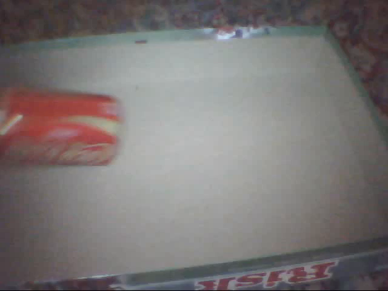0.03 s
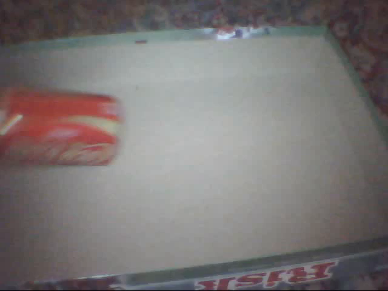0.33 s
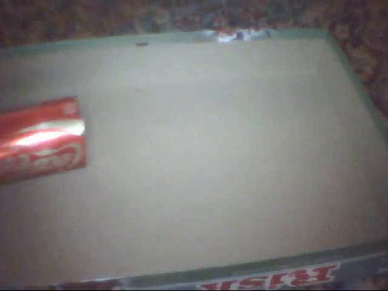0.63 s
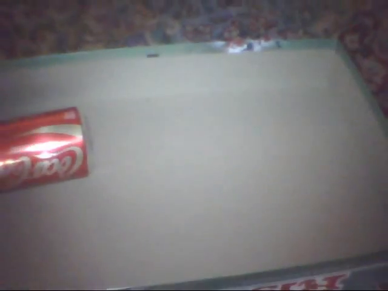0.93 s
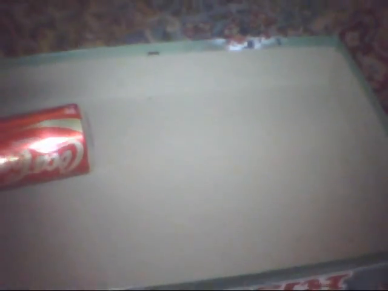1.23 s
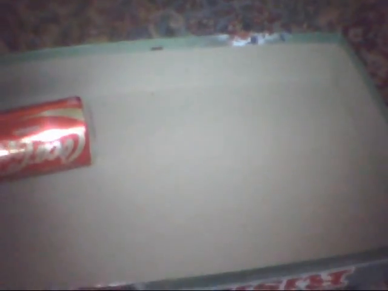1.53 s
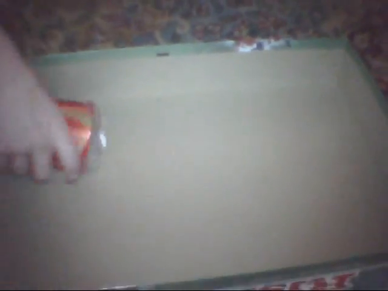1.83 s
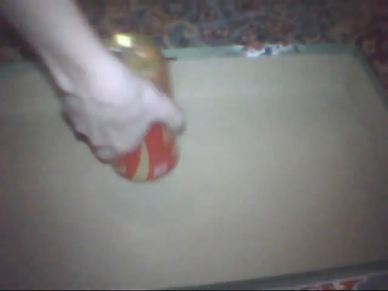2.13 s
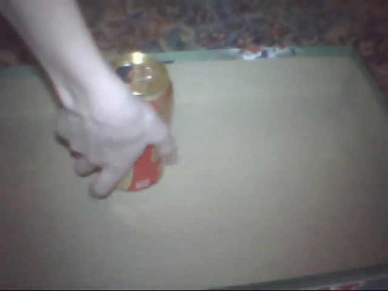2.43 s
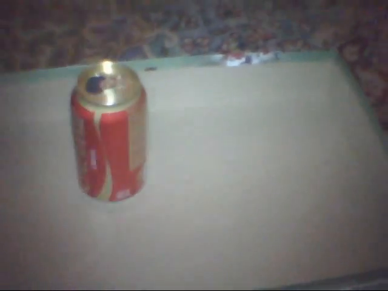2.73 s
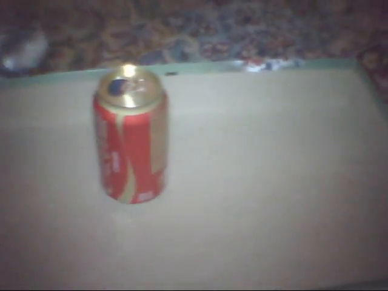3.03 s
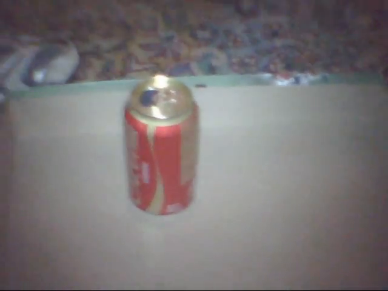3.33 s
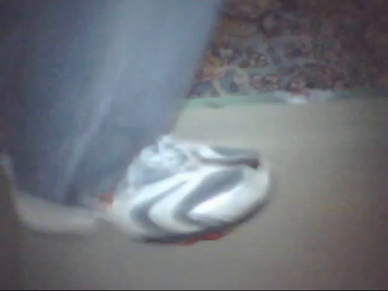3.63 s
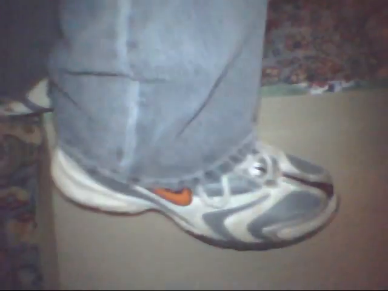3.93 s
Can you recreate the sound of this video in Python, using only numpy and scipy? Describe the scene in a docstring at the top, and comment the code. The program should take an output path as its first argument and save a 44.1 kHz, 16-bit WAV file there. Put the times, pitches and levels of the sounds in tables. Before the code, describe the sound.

A drink can is stamped flat with a dense metallic crunch and a floor thump, after first knocking twice on cardboard and being quietly handled. The small carpeted room is picked up by a cheap microphone with hum and hiss.

```python
"""Dropping and stamping on a can

An empty drink can drops into a shallow cardboard box and rattles to rest; a hand stands it upright.
A shoe stamps it flat: the wall buckles in a dense crunch, the sole lands and the floor bounces.
A cheap, dull microphone in a small carpeted room overloads on the blows and hums with the mains."""
import sys
import numpy as np
from scipy import signal
from scipy.fft import rfft, irfft
from scipy.io import wavfile
from scipy.ndimage import uniform_filter1d

SR = 44100
rng = np.random.default_rng(int(sys.argv[2]) if len(sys.argv) > 2 else 0)


def wav_record(signal):
    """Record a signal, one row per channel, as 16-bit PCM in the file named by sys.argv[1]."""
    frames = np.transpose(np.atleast_2d(signal))
    bounded = np.clip(frames, -1, 1)
    # unit amplitude maps onto the largest positive 16-bit level
    quanta = np.round(bounded * 32767).astype(np.int16)
    wavfile.write(sys.argv[1], SR, quanta)


N = 176400

# tone of struck cardboard: (frequency [Hz], relative level [dB])
CARDBOARD_TONE = [(60, 7), (200, -3.5), (450, 5.5), (900, -3.5), (1600, -10.5), (2500, -17), (3500, -40.5),
                  (7000, -42)]
# tone of a sharp crack of metal: (frequency [Hz], relative level [dB])
CRACK_TONE = [(200, -14), (800, 9.5), (1600, 11.5), (2800, -2.5), (3400, 5.5), (4400, 3.5), (6000, 1.5),
              (7200, 3.5)]
CARDBOARD_FADE_S, CRACK_FADE_S = .04, .028  # a fade time is how long a sound takes to fall by 60 dB
TOP_HZ = 7700


def undb(db):
    """Turn decibels into a number to multiply by."""
    return 10 ** (np.asarray(db) / 20)


def level(x, db):
    """Set the average (rms) level of a sound."""
    return x * undb(db) / np.sqrt(np.mean(x ** 2))


def blow(x):
    """Scale a hit so that its first 10 ms have an average (rms) strength of 1."""
    return x / np.sqrt(np.mean(x[:SR // 100] ** 2))


def clock():
    """The time of every sample, in seconds."""
    return np.arange(N) / SR


def fade(fade_s):
    """A curve that dies away by 60 dB in the given time."""
    return np.exp(-np.log(1000) * np.minimum(clock() / fade_s, 10))


def along(hz, points):
    """Read between (frequency, value) points, with all octaves equally wide."""
    frequencies, values = np.array(points, float).T
    return np.interp(np.log(np.maximum(hz, 1)), np.log(frequencies), values)


def through(x, response):
    """Let every sample of a sound set off its own copy of a response."""
    return signal.fftconvolve(x, response[:SR])[:N]


def colour(x, points):
    """Filter a sound to give it the listed tone."""
    size = 8192
    gains = undb(along(np.arange(size // 2 + 1) * SR / size, points))
    cepstrum = irfft(np.log(gains))
    cepstrum[1:size // 2] *= 2  # fold one half onto the other, so nothing rings ahead of a hit
    cepstrum[size // 2 + 1:] = 0
    return through(x, irfft(np.exp(rfft(cepstrum))))


def cut_treble(x, hz=TOP_HZ):
    """Steeply remove what lies above a frequency."""
    return signal.sosfilt(signal.cheby1(10, .1, hz, fs=SR, output="sos"), x)


def burst(tone, fade_s):
    """Many close vibrations blur into a short, fading noise."""
    size = SR // 3
    noise = rng.standard_normal(size) * fade(fade_s)[:size]
    return blow(cut_treble(colour(noise, tone)))


def ring(notes):
    """A struck object rings with several pure notes, each fading at its own speed."""
    t = clock()[:SR]
    return blow(sum((-1) ** k * undb(db) * np.sin(2 * np.pi * hz * t) * fade(fade_s)[:SR]
                    for k, (hz, db, fade_s) in enumerate(notes)))


def add(out, start, sound):
    """Mix a sound in at a time in seconds."""
    i = int(start * SR)
    out[i:i + len(sound)] += sound[:N - i]


def electronics(mains_hz=60):
    """The microphone adds mains hum, a thin whine, hiss and a slight rumble."""
    # notes of the hum: (multiple of the mains frequency, level [dB])
    hum_notes = [(1, -21.5), (2, -62.5), (3, -52), (5, -46.5), (7, -62), (9, -65.5)]
    # notes of the electrical whine: (frequency [Hz], level [dB])
    whine_notes = [(1701, -70.5), (1921, -65.5), (3838, -72.5)]
    # tone of the hiss: (frequency [Hz], relative level [dB])
    hiss_tone = [(20, 16), (45, 9.5), (90, 13), (130, 3.5), (350, 1.5), (600, -5.5), (1000, -9.5),
                 (1700, -8.5), (2100, -11.5), (2900, -12), (3400, -14.5), (6600, -19.5)]
    # tone of the rumble: (frequency [Hz], relative level [dB])
    rumble_tone = [(8, -6.5), (22, 3), (45, -15.5), (200, -63.5)]
    t = clock()
    hum = sum(undb(db) * np.sin(2 * np.pi * k * mains_hz * t) for k, db in hum_notes)
    whine = sum(undb(db) * np.sin(2 * np.pi * hz * t) for hz, db in whine_notes)
    hiss = level(cut_treble(colour(rng.standard_normal(N), hiss_tone)), db=-46)
    rumble = level(colour(rng.standard_normal(N), rumble_tone), db=-37)
    return np.sqrt(2) * (hum + whine) + hiss + rumble


def can_ring():
    """The can's thin metal rings with clear notes and a shimmer of weak ones between them."""
    # notes of the can: (frequency [Hz], relative level [dB], fade time [s])
    can_notes = [(870, -10.5, 0.33), (1396, -3, 0.19), (1790, -6, .3), (2240, -10, 0.23), (2580, -10, .2),
                 (3105, -15, .2), (3330, 1, 0.17), (3420, -7, 0.11), (3530, -16.5, 0.11), (3960, -7, 0.16),
                 (4650, -7.5, .19), (4880, -10, .14), (5163, -5, 0.11), (5160, -4.5, 0.097),
                 (5750, -3, .14), (6200, -4, 0.11), (5900, -6, 0.092), (6450, -4, 0.1), (6450, -0.5, 0.09)]
    can = ring(can_notes)
    add(can, 0, undb(-7) * burst(CRACK_TONE, fade_s=.12))
    return can


def taps(can):
    """Rim and fingers tap lightly as the can rocks, is gripped and is set down."""
    # light touches: (time [s], tap [dB], metal crack [dB], can ring [dB])
    touches = [(.038, -29.5, -36.5, -52.5), (0.2802, -37.5, -53, -56.5), (.381, -38, -58.5, -60.5),
               (.584, -24.5, -29.5, -52), (.596, -34, -33, -43.5), (1.54, -44.5, -63.5, -63),
               (1.695, -37.5, -38.5, -55), (1.700, -32, -37.5, -48), (1.726, -40, -43.5, -48),
               (1.75, -48, -46, -71), (2.242, -32.5, -49, -63), (2.405, -43.5, -54, -76),
               (2.518, -35.5, -58.5, -69), (2.599, -44.5, -67, -83.5), (2.654, -46, -56.5, -69),
               (2.781, -45.5, -67, -79), (3.955, -42, -51.5, -62), (3.975, -36, -55, -67)]
    # tone of a tap: (frequency [Hz], relative level [dB])
    tap_tone = [(150, -19), (330, 5.5), (480, 5.5), (750, 1.5), (950, 1.5), (1150, -9.5), (1550, -0.5),
                (2050, -14), (2450, -6.5), (2700, -13), (3000, -23), (3400, -18), (4000, -29),
                (7000, -35.5)]
    out = np.zeros(N)
    for start, tap_db, crack_db, ring_db in touches:
        add(out, start, undb(tap_db) * burst(tap_tone, fade_s=.03))
        add(out, start, undb(crack_db) * burst(CRACK_TONE, CRACK_FADE_S))
        add(out, start, undb(ring_db) * can)
    return out


def knocks(can):
    """The can lands and bounces: the cardboard knocks and booms, the metal cracks and rings."""
    # hits on the box: (time [s], cardboard [dB], boom [dB], metal crack [dB], can ring [dB], contact [s])
    hits = [(0.0596, -19, -20, -15, -50, 0.0026), (0.0612, -12, -16.5, -16, -46.5, 0.0022),
            (0.0644, -10, -20.5, -13, -48.5, 0.00099), (0.078, -17.5, -19, -43, -47.5, 0.0036),
            (0.095, -19.5, -23.5, -41.5, -47.5, .002), (0.118, -24, -29, -33, -52.5, .002),
            (0.153, -31.5, -29, -54, -62, .004), (0.5219, -19, -33.5, -16, -24, 0.0013),
            (.535, -26, -36.5, -43, -43, 0.00084), (.654, -46, -49.5, -37, -50.5, 0.0028),
            (.711, -51.5, -62, -50.5, -58.5, 0.0026)]
    # notes of the cardboard: (frequency [Hz], relative level [dB], fade time [s])
    box_notes = [(403, 1, 0.066), (481, -3.5, 0.059), (512, -10.5, 0.14), (611, -5, 0.051), (870, -10, .05),
                 (1272, -12, 0.05), (1440, -25.5, 0.078), (1630, -11, 0.04), (1817, -16, 0.068),
                 (2320, -12, 0.027), (2530, -15, 0.021)]
    # the whole box heaving on the carpet: (frequency [Hz], relative level [dB], fade time [s])
    boom_notes = [(138, -0.5, 0.17), (205.3, 3, 0.1), (268, 1.5, 0.12)]
    # notes of the can's stiff end: (frequency [Hz], relative level [dB], fade time [s])
    end_notes = [(3280, -8, .17), (5700, -18.5, .18), (6860, -2.5, 0.24), (6930, 7.5, 0.23)]
    out, box, boom = np.zeros(N), ring(box_notes), ring(boom_notes)
    for start, box_db, boom_db, crack_db, ring_db, contact_s in hits:
        add(out, start, undb(box_db) * box + undb(boom_db) * boom + undb(ring_db) * can)
        add(out, start, undb(box_db + .5) * burst(CARDBOARD_TONE, CARDBOARD_FADE_S))
        add(out, start, undb(crack_db) * burst(CRACK_TONE, fade_s=10 * contact_s))
    add(out, .0645, undb(-36.5) * ring(end_notes))  # only the first landing rings the end
    return out


def hollow_air():
    """The air in the can rings on each hard landing, sinking in pitch as the can settles."""
    # hard landings: (time [s], level [dB])
    landings = [(.065, -25), (.524, -24)]
    final_hz, sink_hz, sink_s = 347.7, 71.4, .032
    hz = final_hz + sink_hz * np.exp(-clock() / sink_s)
    note = np.sin(2 * np.pi * np.cumsum(hz) / SR) * fade(.51)
    out = np.zeros(N)
    for start, db in landings:
        add(out, start, undb(db) * note)
    return out


def rubbing():
    """The can slides, then the sleeve and hand, with a soft, uneven hiss."""
    # strength of the sliding: (time [s], level [dB])
    sliding = [(.1, -49), (.19, -60), (.22, -50), (.27, -55), (0.399, -66.5), (1.349, -67), (1.43, -55),
               (1.58, -63.5), (1.655, -50.5), (1.68, -52), (1.73, -47), (1.78, -61), (1.9, -59.5),
               (2.05, -65.5), (2.17, -58.5), (2.35, -67.5), (2.72, -61), (3.45, -59.5)]
    # tone of the rubbing: (frequency [Hz], relative level [dB])
    rub_tone = [(300, -6.5), (1400, 3.5), (2200, -1), (3500, -3), (4500, -3), (6000, 2.5), (7000, -2.5)]
    times, db = np.array(sliding).T
    roughness_db = 2 * level(uniform_filter1d(rng.standard_normal(N), size=300), db=0)
    hiss = level(cut_treble(colour(rng.standard_normal(N), rub_tone)), db=0)
    return hiss * undb(np.interp(clock(), times, db) + roughness_db)


def thin_tone():
    """A faint, thin tone wavers in the background."""
    # path of the tone: (time [s], frequency [Hz], level [dB])
    path = [(2.7, 1480, -69), (2.82, 1530, -61.5), (2.92, 1570, -61.5), (3.049, 1510, -62),
            (3.09, 1335, -71), (3.13, 1330, -57), (3.19, 1395, -67.5), (3.42, 1405, -61.5),
            (3.501, 1400, -63)]
    t = clock()
    times, hz, db = np.array(path).T
    strength = np.sqrt(2) * np.interp(t, times, undb(db), left=0, right=0)
    return strength * np.sin(2 * np.pi * np.cumsum(np.interp(t, times, hz)) / SR)


def crumple(can):
    """The wall buckles in a swarm of snaps, which also make the can ring."""
    # force of the crushing: (time [s], level [dB])
    crushing = [(3.497, -25), (3.513, -13), (3.529, -8.5), (3.55, -9), (3.576, -10.5), (3.606, -15),
                (3.629, -18.5), (3.666, -25.5), (3.70, -32), (3.8, -47), (3.88, -49.5), (3.94, -68)]
    snaps_per_s, spread_db, snap_fade_s, ring_db = 1700, 3, .0072, -16.5
    t = clock()
    times, db = np.array(crushing).T
    force = undb(np.interp(t, times, db)) * (t > times[0]) * (t < times[-1])
    snapping = rng.random(N) < snaps_per_s / SR
    snaps = snapping * undb(spread_db * np.minimum(rng.exponential(size=N), 4))
    energy = np.abs(through(snaps ** 2, fade(snap_fade_s)))
    crackle = np.sqrt(energy) * rng.standard_normal(N)  # the square root doubles the fade time
    # tone of the crunch: (frequency [Hz], relative level [dB])
    crunch_tone = [(100, 1.5), (400, 5.5), (1000, -0.5), (2500, -0.5), (4000, -2.5), (6000, 0.5),
                   (7200, -2.5)]
    crunch = force * level(cut_treble(colour(crackle, crunch_tone)), db=0)
    ringing = through(crunch, can)
    return crunch + undb(ring_db) * ringing * crunch.std() / ringing.std()


def stamp():
    """The shoe hits the can, pops its domed base and thuds through it onto the floor."""
    # blows of the shoe: (time [s], thud [dB], cardboard [dB], metal crack [dB])
    blows = [(3.499, -13, -15, -11.5), (3.505, -35, -5.5, -16.5), (3.536, -13, -25, -22),
             (3.557, -11, -17.5, -17.5), (3.589, -9, -15.5, -22.5), (3.602, -19, -16, -20),
             (3.653, -22.5, -18.5, -32.5), (3.659, -23, -31, -19.5)]
    # notes of the floor: (frequency [Hz], relative level [dB], fade time [s])
    floor_notes = [(46.3, -2.5, 0.088), (93.6, -1, 0.12), (118.5, -4, 0.11), (177, -6, 0.091),
                   (248.5, -14, 0.14)]
    # notes of the popping dome: (frequency [Hz], relative level [dB], fade time [s])
    pop_notes = [(400, -3, .03), (733, -3.5, 0.02), (1020, 6, 0.02), (1400, -2, 0.012)]
    out, thud = np.zeros(N), ring(floor_notes)
    for start, thud_db, cardboard_db, crack_db in blows:
        add(out, start, undb(thud_db) * thud)
        add(out, start, undb(cardboard_db) * burst(CARDBOARD_TONE, CARDBOARD_FADE_S))
        add(out, start, undb(crack_db) * burst(CRACK_TONE, CRACK_FADE_S))
    add(out, 3.507, undb(-15.5) * ring(pop_notes))
    return out


def floor_bounce(start=3.553, hz=21.59, rise_s=.062, fade_s=.93):
    """The floor swings slowly up and down after the sole lands."""
    out, t = np.zeros(N), clock()
    swing = np.sin(2 * np.pi * hz * t) * (1 - np.exp(-t / rise_s))
    add(out, start, undb(5) * swing * fade(fade_s))
    return out


def creak(peak_s=3.905, hz=500, width_s=.012):
    """Something creaks briefly under the sole."""
    t = clock()
    return undb(-38) * np.sin(2 * np.pi * hz * t) * np.exp(-((t - peak_s) / width_s) ** 2)


def room(x, delay_s=.008):
    """Echoes in the small room blur into a tail whose treble dies first."""
    # how long the room rings: (frequency [Hz], fade time [s])
    fade_times = [(100, 0.74), (400, 0.53), (1000, 0.5), (2800, .36), (7000, 0.2)]
    tail = np.zeros(SR)
    for hz in 125 * 2. ** np.arange(7):
        octave = signal.butter(3, [hz / np.sqrt(2), hz * np.sqrt(2)], "band", fs=SR, output="sos")
        tail += signal.sosfilt(octave, rng.standard_normal(SR)) * fade(along(hz, fade_times))[:SR]
    tail *= clock()[:SR] > delay_s
    return undb(-17) * through(x, tail / np.sqrt(2 * np.sum(tail ** 2)))


def scene(power_on_s=.038):
    """Can, box and shoe sound in the room, over the microphone's own noise."""
    can = can_ring()
    direct = knocks(can) + taps(can) + hollow_air() + rubbing() + thin_tone()
    direct += crumple(can) + stamp() + floor_bounce() + creak()
    mix = direct + room(direct) + electronics()
    return (mix * (clock() > power_on_s))[None]


def record(dry):
    """The microphone flattens loud peaks, cuts out for instants and loses the high treble."""
    # gaps during the heaviest overload: (time [s], length [s])
    gaps = [(3.551, .003), (3.5546, .0016), (3.6056, .0022)]
    ceiling, full_scale = .82, .9
    t = clock()
    live = np.prod([(t < start) | (t > start + length) for start, length in gaps], axis=0)
    dull = cut_treble(live * np.clip(dry, -ceiling, ceiling), hz=6613)
    smoothing = signal.ellip(6, .2, 45, TOP_HZ, fs=SR, output="sos")
    return signal.sosfilt(smoothing, np.clip(dull, -full_scale, full_scale))


dry = scene()
out = record(dry)
wav_record(out)
```